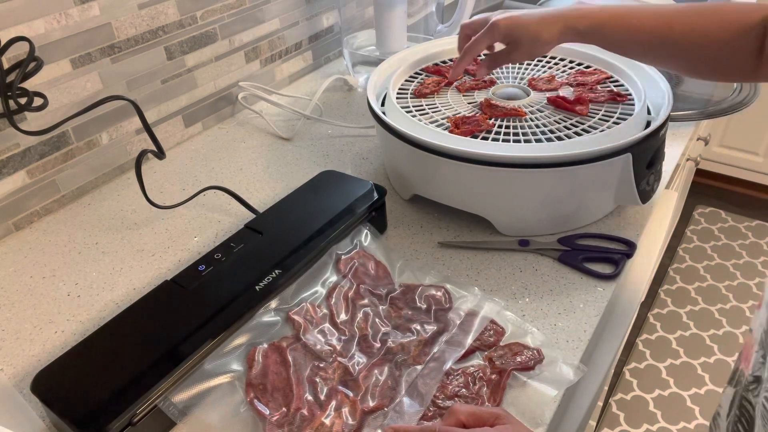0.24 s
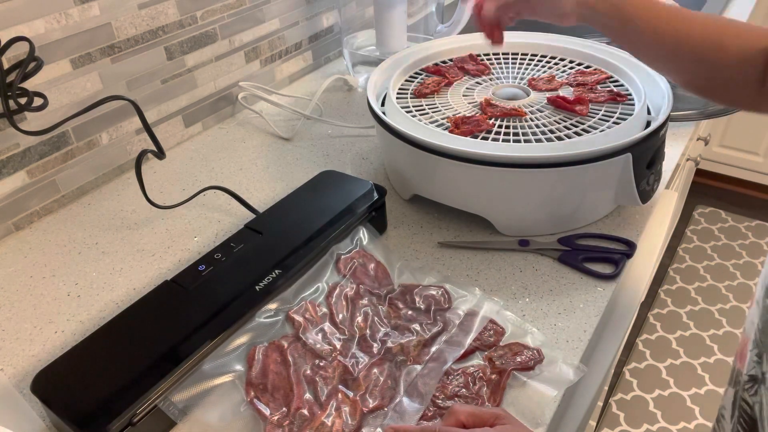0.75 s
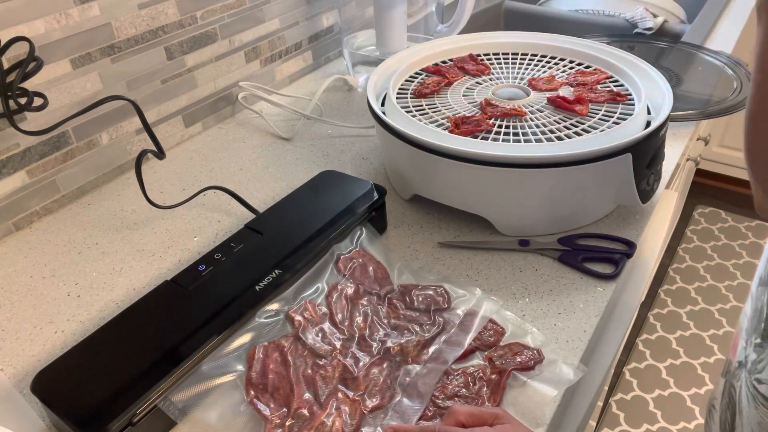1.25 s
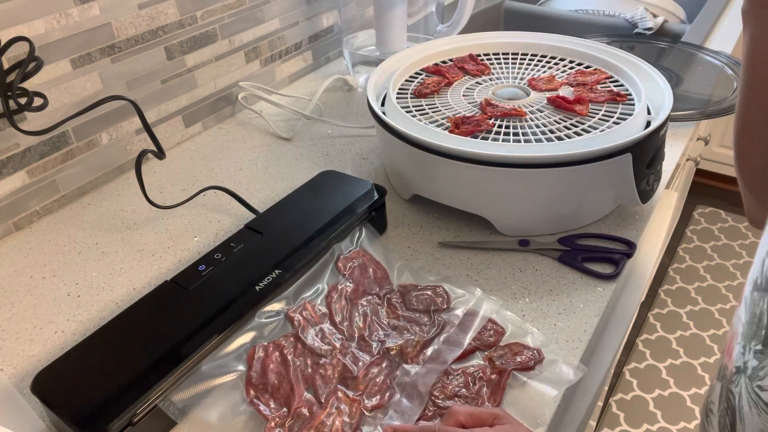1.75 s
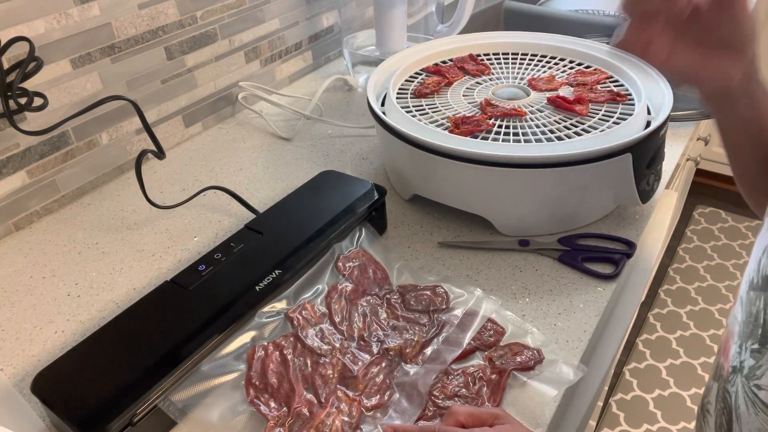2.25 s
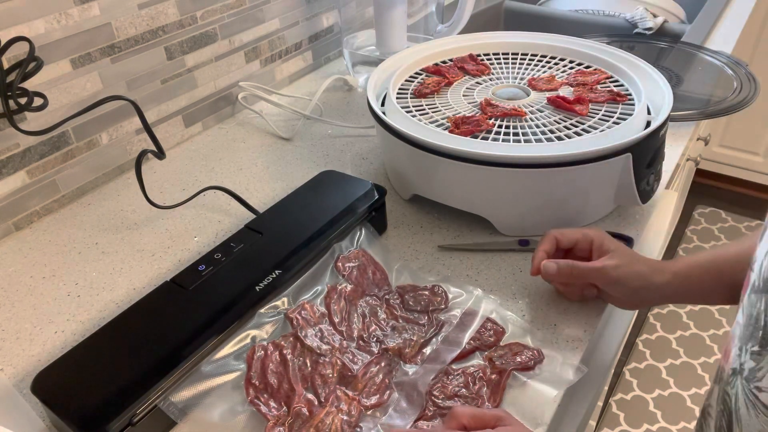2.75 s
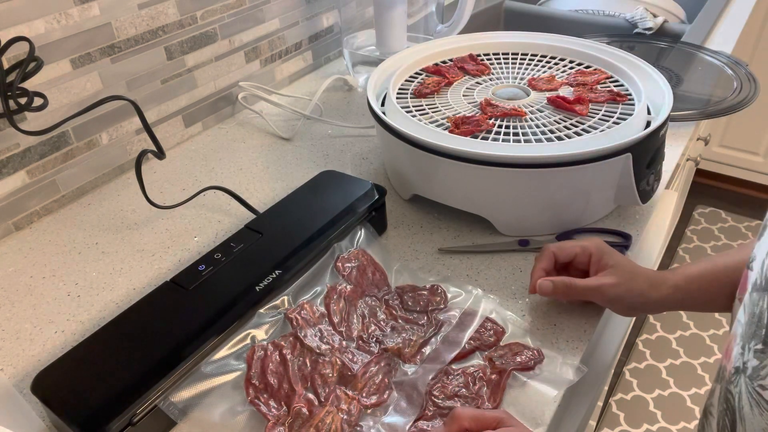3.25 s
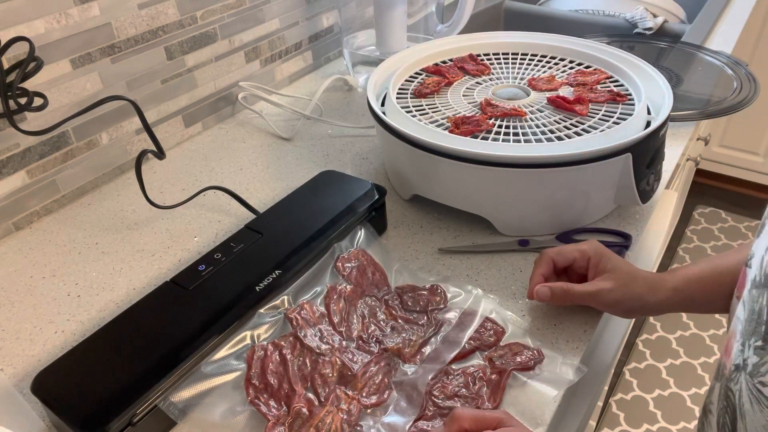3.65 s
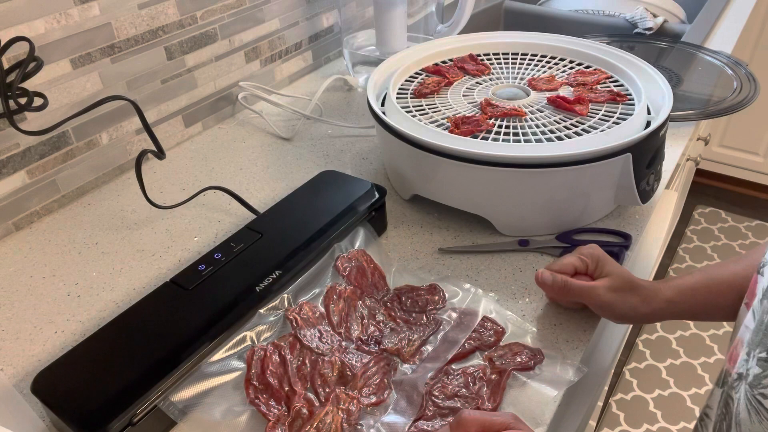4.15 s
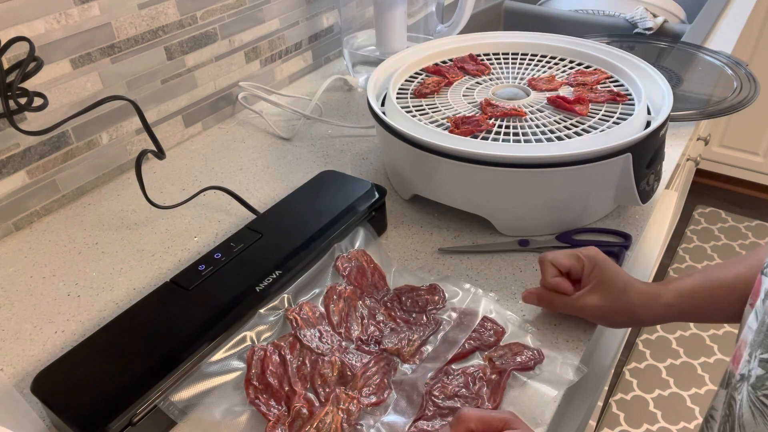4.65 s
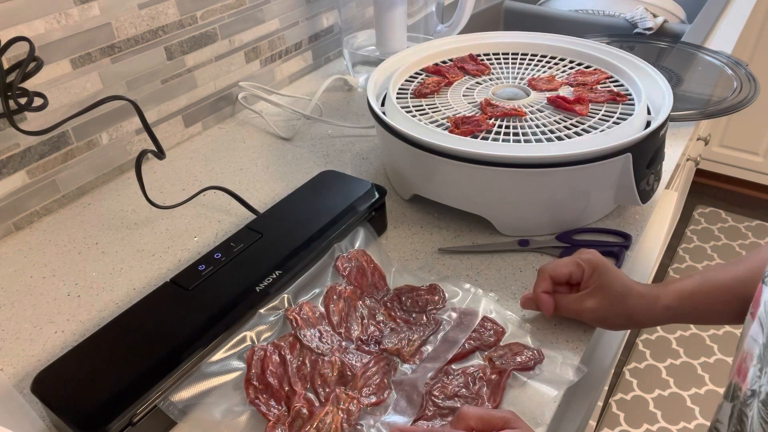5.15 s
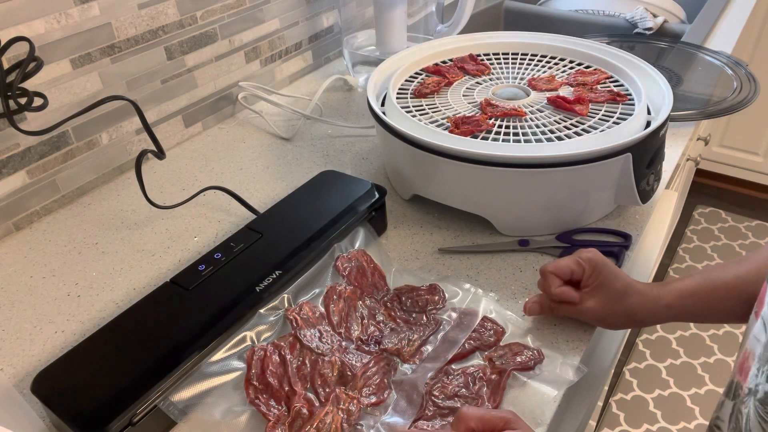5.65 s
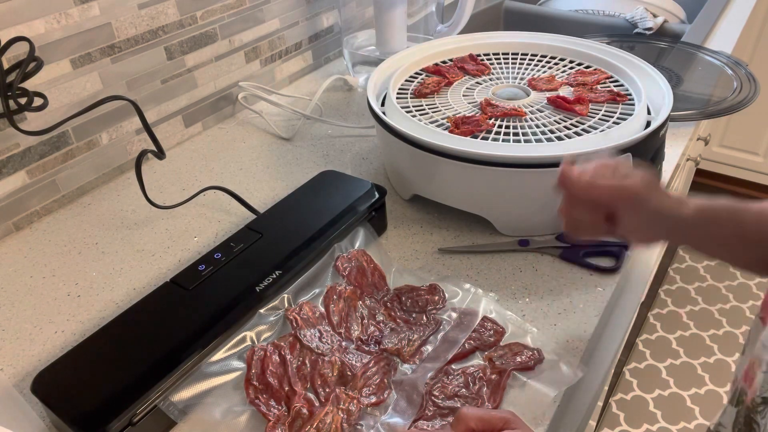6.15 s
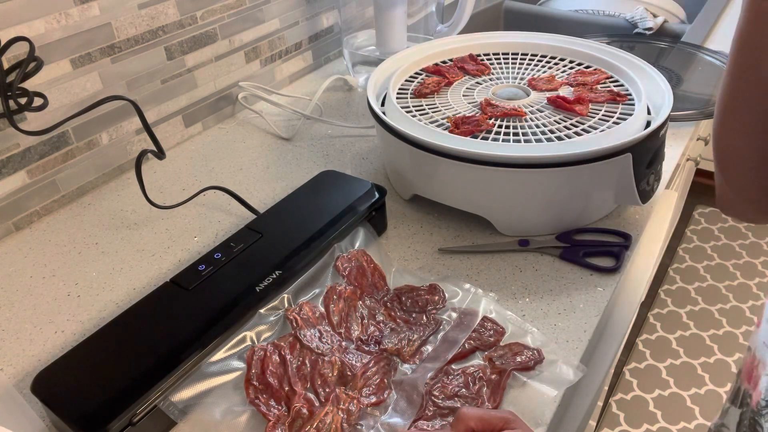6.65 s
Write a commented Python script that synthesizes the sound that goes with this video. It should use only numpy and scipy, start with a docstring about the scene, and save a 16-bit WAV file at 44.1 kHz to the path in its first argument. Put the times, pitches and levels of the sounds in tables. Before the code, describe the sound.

A vacuum sealer is already running, its nasal, rattling drone filling a small kitchen with little echo. It slowly labours downward as the bag tightens, gaining ticks, puffing hiss and uneven gulps, then a hard buzzing knock. After a split-second drop, the unloaded motor jumps up slightly in pitch and hums evenly. Near the end a hand briefly crinkles the plastic. Heard close, in stereo.

```python
"""A kitchen counter, heard in stereo: a vacuum sealer pulls the air out of a bag of meat.
Its diaphragm pump is a drone of shaft multiples that slows and labours as the vacuum builds; filtered
clicks make the valves tick and pulsed noise puffs out air on every turn; at last the diaphragm knocks.
After a short dip it runs on faster and smoother while the bag is sealed. The plastic snaps twice early on
in scattered clicks, rustles as grainy noise, and squeaks as tiny chirps."""
import sys
import numpy as np
from scipy import signal
from scipy.fft import rfft, irfft
from scipy.io import wavfile
from scipy.ndimage import map_coordinates

SR = 44100
rng = np.random.default_rng(int(sys.argv[2]) if len(sys.argv) > 2 else 0)


def output_pcm(signal):
    """Save a mono or channel-first signal as 16-bit PCM at the path in sys.argv[1].

    Samples are clipped to [-1, 1] before scaling.
    """
    pcm = np.clip(np.atleast_2d(signal).T, -1, 1) * 32767
    wavfile.write(sys.argv[1], SR, np.round(pcm).astype(np.int16))


N = 304290
TIME = np.arange(N) / SR
BINS = np.fft.rfftfreq(N, 1 / SR)
SWITCH_S = 3.728   # pumping gives way to sealing


def from_db(db):
    """Turn decibels into an amplitude factor."""
    return 10 ** (np.asarray(db) / 20)


def rms_one(x):
    """Scale a sound to an RMS of 1, both channels together."""
    return x / np.sqrt(np.mean(np.abs(x) ** 2) + 1e-20)


def in_time(rows):
    """Read each column of a curve sample by sample."""
    seconds, *columns = np.transpose(rows)
    return [np.interp(TIME, seconds, column) for column in columns]


def at_hz(points, hz, axis=1):
    """Read one column of a spectrum on a log-frequency axis."""
    points = np.array(points)
    return np.interp(np.log(hz + 1e-9), np.log(points[:, 0]), points[:, axis])


def colour(x, spectrum):
    """Shape a sound by a smooth spectrum."""
    return irfft(rfft(x) * from_db(at_hz(spectrum, BINS)), N)


def drift(rate):
    """Slow chance: unit random knots, rate of them per second, joined by straight lines."""
    knots = rng.standard_normal(2048)
    return np.interp(TIME * rate, np.arange(len(knots)), knots)


# Diffuse sound at the microphone. Each row: frequency in Hz, side against mid in dB.
WIDTH = [(60, -19.5), (200, -3.5), (700, 9), (1300, -3.5), (2400, 8), (3900, -2.5), (6000, 4), (9000, -1),
         (14000, 3)]
DIRECT_SHARE = 0.6   # of the side power, the part that comes straight and reaches the left port first


def widen(pair):
    """Left and right share a direct sound, shifted in phase, and differ by a diffuse one."""
    direct = 1j * np.sqrt(DIRECT_SHARE) * rfft(pair[0])
    diffuse = np.sqrt(1 - DIRECT_SHARE) * rfft(pair[1])
    side = irfft((direct + diffuse) * from_db(at_hz(WIDTH, BINS)), N)
    return np.array([pair[0] + side, pair[0] - side])


def noise():
    """White noise spread over the two microphone ports."""
    return widen(rng.standard_normal((2, N)))


# Resonances of the plastic case. Each row: frequency in Hz, width in Hz, gain in dB at depth 1.
HOUSING = [(1248, 70, -4), (1490, 86, 0.5), (1640, 140, 10.5), (1895, 170, 10), (2120, 350, 8.5),
           (2490, 73, 10), (2684, 150, 14), (3040, 140, 5.5), (3510, 120, 12.5), (4122, 150, 10.5),
           (4466, 95, 12), (4870, 68, 8.5), (5224, 63, 17.5), (5560, 110, 4), (6030, 72, 6.5)]


def housing(x, depth):
    """The plastic case colours narrow bands, mostly lifting them; depth sets how strongly."""
    out = x
    for hz, width_hz, gain_db in HOUSING:
        b, a = signal.iirpeak(hz, hz / width_hz, fs=SR)
        out = out + (from_db(depth * gain_db) - 1) * signal.lfilter(b, a, x)
    return out


def scatter(x, case_t60, room_db, room_t60):
    """A contact rattles briefly through the case, then dies away in the kitchen (t60 in s)."""
    age = TIME[:SR // 2]
    decay = from_db(-60 * age / case_t60) + from_db(room_db - 60 * age / room_t60)
    response = rng.standard_normal((2, len(age))) * decay
    response /= np.sqrt(np.sum(response ** 2) / 2)
    return widen(signal.fftconvolve(x[None], response, axes=1)[:, :N])


def strokes(turns, share):
    """A unit click each time the shaft passes this share of a turn."""
    at = np.interp(np.arange(int(turns[-1])) + share, turns, np.arange(N)).clip(0, N - 2)
    clicks = np.zeros(N)
    # split each click over two samples to place it between them
    clicks[at.astype(int)] = 1 - at % 1
    clicks[at.astype(int) + 1] = at % 1
    return clicks


# Standing waves over the counter. Each row: frequency in Hz, left against right in dB,
# phase in radians by which the left microphone port leads.
PORTS = [(55, 0.5, -0.01), (205, 1.4, 0.48), (310, 2.9, -0.37), (400, -3.5, -0.95), (490, -2.9, 0.83),
         (555, -1.1, 0.63), (610, -2.3, 0.65), (655, 5.6, 0.72), (712, 7.2, 0.31), (765, 5.8, 0.37),
         (818, -0.3, 0.44), (870, 3.1, 0.07), (990, 5.8, 0.43), (1200, 0, 0)]


def partial(turns, order, shaft_hz, delay):
    """One multiple of the shaft rate as both microphone ports get it."""
    hz = order * shaft_hz
    tilt, lead = from_db(at_hz(PORTS, hz) / 2), at_hz(PORTS, hz, axis=2)
    angle = 2 * np.pi * order * turns - delay
    left = tilt * np.cos(angle + lead / 2)
    right = np.cos(angle - lead / 2) / tilt
    return np.array([left, right]) * np.sqrt(2 / (tilt ** 2 + tilt ** -2))


MULTIPLES = np.arange(1, 49)   # of the shaft rate


def ring_lag(partials):
    """Radians by which each multiple trails the blow in a chamber that starts at once and rings on."""
    level = np.log(from_db(np.interp(np.arange(64), *np.transpose(partials))))
    mirrored = np.r_[level, level[-2:0:-1]]
    return signal.hilbert(mirrored).imag[MULTIPLES]


# The drone, from free flow to no air left. Each row: multiple of the shaft rate, relative level in dB.
FREE_FLOW = [(3, -17), (8, -24), (9, -5.5), (10, -1), (11, 1), (12, 0), (13, -3), (14, -6), (15, 0),
             (16, -3.5), (17, -36), (18, -16), (20, -38), (21, -22), (22, -18), (24, -18), (25, -19),
             (29, -24), (30, -26), (32, -19), (33, -20), (34, -17), (40, -18.5), (44, -21.5)]     # air still flows freely
FIRST_PULL = [(3, -15), (6, -11), (7, -37), (8, -8.5), (9, -6.5), (10, -4), (11, -6.5), (12, -1), (13, -23),
              (14, -11.5), (15, -5.5), (16, 3.5), (17, -31), (18, -3.5), (21, -27), (23, -12.5),
              (27, -16.5), (31, -19), (33, -15.5), (41, -23)]   # the pump begins to strain
DRAWING = [(3, -20), (6, -13.5), (7, -16.5), (8, -6), (9, 2.5), (10, -10.5), (11, -5.5), (12, -1),
           (13, -6.5), (14, 6), (16, -4), (17, -28), (18, -12), (19, -14), (20, -17), (21, -40),
           (25, -19.5), (28, -18.5), (32, -23), (33, -32), (34, -16.5), (36, -31), (37, -22), (41, -18),
           (45, -23.5)]         # the film closes in
LABOURING = [(3, -11.5), (7, -2), (8, -7), (9, 2.5), (10, 1), (11, 4.5), (12, 7.5), (13, -3), (14, 6.5),
             (15, 0.5), (16, -36), (17, -7), (18, -11.5), (19, -7.5), (20, -11.5), (23, -15.5), (25, -17.5),
             (27, -14), (28, -20), (32, -30), (33, -25.5), (34, -19), (35, -18), (37, -15.5), (41, -16),
             (46, -19)]     # hardest work
BAG_TIGHT = [(3, -13.5), (6, -12), (9, -0.5), (10, -4.5), (11, -1.5), (12, 4.5), (13, -5.5), (14, 5),
             (15, -23), (16, -5.5), (17, -5.5), (18, -7.5), (19, -8), (20, -11), (21, -10), (24, -14.5),
             (25, -31), (26, -27), (29, -17.5), (31, -36), (32, -12.5), (33, -19), (35, -33), (37, -15),
             (44, -22)]     # little air is left
NO_AIR = [(3, -12.5), (5, -24), (6, -11), (7, -14), (8, -19.5), (9, 0), (10, -4.5), (11, -1.5), (12, 1),
          (13, 1.5), (14, 6.5), (15, -15), (16, -4.5), (17, -7), (18, -11.5), (19, -6.5), (20, -6.5),
          (22, -16), (24, -9.5), (28, -13), (32, -18), (37, -19), (44, -22)]           # the diaphragm works against a vacuum
# The stroke behind each drone. Each row: load, share of a turn at the blow,
# sweep of the low partials in radians per squared multiple, share of a turn at the rap.
STROKE_SHAPES = [(0, .14, .04, .25), (.4, .46, 0, .23), (1, .65, 0, .25), (2, .26, .13, .26),
                 (3, .5, .13, .49), (4, .45, .05, .49)]
SWEEP_CENTRE, RAP_FROM = 11.5, 20   # multiples: centre of the sweep, lowest in the rap
ECHO_DEPTH, ECHO_SHARE = 0.85, 0.3   # echo in the case: radians, lag as a share of a turn


def at_load(load, values):
    """Blend the drones' values to one load, as a column over the multiples."""
    loads = np.transpose(STROKE_SHAPES)[0]
    return np.array([[np.interp(load, loads, column)] for column in values.T])


def loaded_drone(turns, shaft_hz, load):
    """One blow per turn rings the pump chamber; its ring changes smoothly with the load."""
    gains, delays = np.zeros((2, len(STROKE_SHAPES), len(MULTIPLES)))
    for k, partials in enumerate((FREE_FLOW, FIRST_PULL, DRAWING, LABOURING, BAG_TIGHT, NO_AIR)):
        _, blow, sweep, rap = STROKE_SHAPES[k]
        for order, level_db in partials:
            gains[k, round(order) - 1] = from_db(level_db)
        # the tubing spreads the low partials into a sweep; the high ones arrive together as a rap
        ring = ring_lag(partials) + np.pi + 2 * np.pi * MULTIPLES * blow
        ring = ring + sweep * (MULTIPLES - SWEEP_CENTRE) ** 2
        delays[k] = np.where(MULTIPLES < RAP_FROM, ring, 2 * np.pi * MULTIPLES * rap)
    # an echo in the case fills the gaps between blows
    delays += ECHO_DEPTH * np.sin(2 * np.pi * MULTIPLES * ECHO_SHARE)
    delays = np.unwrap(delays, axis=0)
    # one turn of the drone at each of 41 loads, then read along load and shaft angle
    loads, cycle = np.linspace(0, 4, 41), np.linspace(0, 1, 1025)
    waves = []
    for step in loads:
        parts = partial(cycle, MULTIPLES[:, None], shaft_hz, at_load(step, delays))
        waves.append(rms_one(np.sum(at_load(step, gains) * parts, axis=1)))
    where = [load / loads[1], turns % 1 * (len(cycle) - 1)]
    sides = np.stack(waves, axis=1)
    return np.array([map_coordinates(side, where, order=1, mode="nearest") for side in sides])


WAVER_DB, WAVER_DELAY_S = -7.5, 0.007562   # the reflection
WAVER_SWING_S, WAVERS_PER_S = 0.00046, 2.277   # how far and how often its delay wanders


def waver(x):
    """A reflection whose delay wanders makes single partials fade and swell."""
    earlier = TIME - WAVER_DELAY_S - WAVER_SWING_S * drift(WAVERS_PER_S)
    return x + from_db(WAVER_DB) * np.array([np.interp(earlier, TIME, side) for side in x])


# Trapped air comes loose. Each row: time in seconds, half length in seconds, rise of unevenness in dB.
GULPS = [(1.529, 0.049, 4.5), (2.765, 0.036, 14.5), (3.05, 0.18, 4.5), (3.3, 0.098, 5.5),
         (3.69, 0.068, 3.5)]
PUMP_UNEVEN_DB, SEAL_UNEVEN_DB = -23, -40


def unevenness_db():
    """The strokes are always slightly uneven; each gulp makes them more so for a moment."""
    swell = sum(rise_db * np.exp(-((TIME - s) / length) ** 2) for s, length, rise_db in GULPS)
    return np.where(TIME < SWITCH_S, PUMP_UNEVEN_DB + swell, SEAL_UNEVEN_DB)


# Valve closings. Each row: share of a turn, relative force in dB at free flow, the same with no air left.
VALVES = [(.225, 1, -3), (.46, -10, 3), (.6, -8, -16), (.82, -12, -8)]
PUFF_LAG, PUFF_LENGTH = 0.02, 0.24   # air follows each valve, in turns


def valve_strokes(turns, tight):
    """Each valve clicks shut and lets go a fading puff, with a force that shifts as the bag tightens."""
    clicks, puffs = 0, 0.25
    for share, free_db, tight_db in VALVES:
        force = from_db(free_db + tight * (tight_db - free_db))
        clicks = clicks + force * strokes(turns, share)
        puffs = puffs + force * np.exp(-((turns - share - PUFF_LAG) % 1) / PUFF_LENGTH)
    return clicks, puffs


# Valve ticks. Each row: frequency in Hz, relative level in dB.
TICK_COLOUR = [(700, -23), (1000, 12), (1400, -0.5), (1800, -1), (2350, -7.5), (2800, -12), (3250, -15),
               (3600, -13.5), (4400, -12.5), (5300, -21), (6500, -22), (10000, -27.5), (12000, -75)]


def valve_ticks(clicks):
    """The valve clicks, slightly uneven in force, rattle the case."""
    rattle = scatter(clicks * from_db(1.2 * drift(100)), case_t60=0.014, room_db=-18, room_t60=0.3)
    return rms_one(housing(colour(rattle, TICK_COLOUR), depth=0.7))


# Air leaving the exhaust, and the thin hiss of its jet. Each row: frequency in Hz, relative level in dB.
AIR_COLOUR = [(700, -10), (1000, -7.5), (1500, -3.5), (2300, 3.5), (2900, 0), (3500, -4), (4400, 4),
              (5300, -4.5), (6400, -0.5), (8000, -4.5), (10000, -18), (11000, -31.5), (15500, -5.5)]
JET_COLOUR = [(6300, -35), (6800, -2.5), (8000, -10.5), (8550, 8), (9050, -6.5), (9500, 13.5), (10100, -1),
              (10900, -36), (14000, -13.5), (15500, -25.5)]


def exhaust(puffs):
    """Turbulent noise pulsed by the puffs, as air through the case and as a bare jet hiss."""
    pulsed = noise() * puffs
    air = rms_one(housing(colour(pulsed, AIR_COLOUR), depth=1.1))
    jet = rms_one(colour(pulsed, JET_COLOUR))
    return air, jet


# Intake flap. Each row: frequency in Hz, relative level in dB.
FLAP_COLOUR = [(2500, -5), (3600, -13), (4300, 1.5), (5700, 2.5), (6400, -10), (9000, -7), (11000, -40)]
FLAP_SHARE = 0.8   # of a turn, when the flap shuts


def flap(turns):
    """The intake flap shuts with a thin, bright rattle."""
    rattle = scatter(strokes(turns, FLAP_SHARE), case_t60=0.03, room_db=-19, room_t60=0.27)
    return rms_one(housing(colour(rattle, FLAP_COLOUR), depth=1))


# Work of the pump. Each row: time in seconds, load from 0 free flow, 1 drawing down, 2 labouring,
# 3 bag tight to 4 no air left.
LOAD = [(0, 0), (.55, .03), (.88, .4), (1.1, .55), (1.38, 1), (1.55, 1.1), (2.1, 1.95), (2.4, 2.1),
        (2.8, 3), (3.15, 3.1), (3.42, 4)]
# The pump's layers, one row for each load from 0 to 4: drone, counter hum, valve ticks, exhaust air,
# jet hiss, intake flap and knock, all in dB.
LOAD_LEVELS = [(-32.5, -48, -47.5, -54.5, -68, -57.5, -70), (-31.5, -37, -44.5, -53.5, -66, -62, -73),
               (-26.5, -34, -39, -50.5, -55.5, -60, -61), (-27.5, -35.5, -40, -47.5, -53, -56, -50),
               (-29.5, -36.5, -42, -50, -55, -61.5, -43)]
PUMP_PAN_DB = -0.5   # drone and hum, left minus right


def pumping(turns, shaft_hz):
    """Load reshapes the drone and shifts force between the valves; with no air left the diaphragm knocks."""
    load, = in_time(LOAD)
    layers_db = [np.interp(load, np.arange(len(c)), c) for c in np.transpose(LOAD_LEVELS)]
    drone_db, hum_db, tick_db, air_db, jet_db, flap_db, knock_db = layers_db
    # gulps make the strokes uneven in time and force
    uneven = from_db(unevenness_db())
    uneven_turns = turns + 0.012 * uneven * drift(80)
    force_db = uneven * (3.9 * drift(110) + 5.4 * drift(21.88))
    drone = waver(loaded_drone(uneven_turns, shaft_hz, load)) * from_db(drone_db + force_db)
    hum = from_db(hum_db) * partial(turns, order=4, shaft_hz=shaft_hz, delay=0)
    body = (drone + hum) * from_db(PUMP_PAN_DB * np.array([[1], [-1]]) / 2)
    # the crank is out of balance
    wobble = from_db(-55.5) * partial(turns, order=1, shaft_hz=shaft_hz, delay=0)
    clicks, puffs = valve_strokes(turns, tight=load / load.max())
    ticks = from_db(tick_db) * valve_ticks(clicks)
    air, jet = exhaust(puffs)
    breath = from_db(air_db) * air + from_db(jet_db) * jet
    contacts = from_db(flap_db) * flap(turns) + from_db(knock_db) * knock(turns, uneven)
    return body + wobble + ticks + breath + contacts


# Gulped air. Each row: frequency in Hz, relative level in dB.
SPUTTER_COLOUR = [(70, -8), (160, -2.5), (300, 7), (450, -8.5), (700, 10), (1050, 3.5), (1500, -3),
                  (2300, 0.5), (3200, -46.5)]


def sputter(turns):
    """Irregular gulps of air, noise pulsed once a turn, roughen the strokes."""
    pulses = 0.4 + np.exp(-((turns - 0.25) % 1) / 0.3)
    gulps = pulses * from_db(3 * drift(90))
    return from_db(unevenness_db() - 19.5) * rms_one(colour(noise() * gulps, SPUTTER_COLOUR))


# The kitchen around the counter. Each row: frequency in Hz, relative level in dB.
ROOM_COLOUR = [(20, -25), (38, -23), (52, -2.5), (70, -7), (110, -15), (160, -14), (260, -18), (450, -20),
               (700, -20), (1200, -30), (2200, -30), (3500, -41), (9000, -46), (15000, -110)]


def room():
    """Steady, mostly low noise of the kitchen."""
    return from_db(-46) * rms_one(colour(noise(), ROOM_COLOUR))


# A hand brushes the bag. Each row: time in seconds, peak in dB, time to fade by 60 dB in seconds
# (held between 0.01 and 1, so that a negative one stops at once).
BRUSHES = [(3.9, -75, 1), (5.68, -87, .9), (5.801, -73, .2), (6.13, -73, -1), (6.205, -56.5, 0.6),
           (6.255, -64, -1.5), (6.31, -70, -2), (6.46, -83, -5)]
BRUSH_ATTACK_S, CRINKLE_DB = 0.013, -90   # the film never quite rests


def brushing():
    """Each brush of the hand swells quickly and fades."""
    level = from_db(CRINKLE_DB)
    for s, db, t60 in BRUSHES:
        age = TIME - s
        swell = np.exp(np.minimum(age, 0) / BRUSH_ATTACK_S)
        fade = from_db(db - 60 * np.maximum(age, 0) / np.clip(t60, 1e-2, 1))
        level = level + swell * fade
    return level


# Rustling film. Each row: frequency in Hz, relative level in dB.
RUSTLE_COLOUR = [(2000, -19), (5000, -0.5), (8000, 10.5), (11000, -8.5), (13500, 12), (16000, 4)]


def rustle():
    """The film crinkles under the hand: noise in grains of 64 samples, each with its own level."""
    grain_levels = from_db(4 * rng.standard_normal(N // 64 + 1)).repeat(64)[:N]
    return brushing() * rms_one(colour(noise() * grain_levels, RUSTLE_COLOUR))


# Snaps of the film and, at 3.443 s, one knock of the pump. Each row: time in seconds, relative level in dB.
SINGLE_CLICKS = [(0.1832, -28), (0.3769, -38), (3.443, -36)]
# Their shared spectrum. Each row: frequency in Hz, relative level in dB.
SINGLE_CLICK_COLOUR = [(600, -4.5), (1300, 2.5), (2400, -2.5), (3600, 5.5), (4500, -11), (9000, -31),
                       (15000, -59)]


def snaps_and_single_knock():
    """Two snaps of the film and one knock of the pump: clicks that rattle and die away in the kitchen."""
    clicks = np.zeros(N)
    for s, db in SINGLE_CLICKS:
        clicks[round(s * SR)] = from_db(db + 20.5)
    rattle = scatter(clicks, case_t60=0.013, room_db=-26.0, room_t60=0.35)
    return colour(rattle, SINGLE_CLICK_COLOUR)


# Diaphragm knock. Each row: frequency in Hz, relative level in dB.
KNOCK_COLOUR = [(500, -13), (850, 7.5), (1100, -10.5), (1500, 11), (2300, -23), (3200, -38), (8000, -48.5)]


def knock(turns, uneven):
    """The diaphragm slaps at the end of its travel, with a force that drifts from turn to turn."""
    uneven_turns = turns + 0.02 * uneven * drift(80)
    clicks = strokes(uneven_turns, 0.465) * from_db(1.8 * drift(60))
    rattle = scatter(clicks, case_t60=0.0047, room_db=-17.5, room_t60=0.29)
    return rms_one(colour(rattle, KNOCK_COLOUR))


BREAK_S = 3.724   # the deepest point
BREAK_DEPTH_DB, BREAK_FALL_S, BREAK_RISE_S = 21.5, 0.0286, 0.025


def changeover():
    """The level of the whole sound falls and recovers between pumping and sealing."""
    away = np.maximum((BREAK_S - TIME) / BREAK_FALL_S, (TIME - BREAK_S) / BREAK_RISE_S)
    return from_db(-BREAK_DEPTH_DB * np.clip(1 - away, 0, 1))


# The unloaded pump; early and late strokes alternate and give half multiples.
# Each row: multiple of the shaft rate, relative level in dB.
SEAL_DRONE = [(1.0, -16.5), (3.0, -24.5), (4.0, -20), (6.0, -22.5), (6.5, -23), (7.0, -20), (7.5, -25),
              (8.0, -21), (9.0, -19), (10.0, -17), (10.5, -29), (11.0, -13.5), (11.5, -13.5), (12.0, 1.5),
              (12.5, -13.5), (13.0, -1), (13.5, -14), (14.0, -24), (15.0, -16.5), (16.0, -24.5),
              (17.0, -27), (18.0, -25), (19.0, -25.5), (21.0, -28), (22.0, -26), (23.0, -38.5),
              (25.0, -32.5), (32.0, -35.5), (33.0, -22.5), (33.5, -40.5), (34.0, -35.5), (38.0, -22.5),
              (40.0, -23), (40.5, -26), (41.0, -46.5), (44.5, -39.5), (45.0, -36), (49.0, -39),
              (54.0, -43.5), (66.0, -43.5)]


def unloaded_drone(turns, shaft_hz, ring_hz, ring_width_hz, dispersion, smear):
    """Every stroke rings the pump chamber; reflections smear its partials. It repeats after two turns."""
    cycle = np.linspace(0, 2, 4097)
    wave, knee = 0, 6.5   # knee: multiples above the ring where the dispersion stops growing
    for order, level_db in SEAL_DRONE:
        halves = round(2 * order)
        delay = np.arctan2(halves / 2 * shaft_hz - ring_hz, ring_width_hz)
        delay += smear * rng.standard_normal()
        delay += dispersion * min(halves / 2 - ring_hz / shaft_hz, knee) ** 2
        delay += np.pi / 2 * (halves % 2)   # half multiples make alternate strokes early and late
        wave = wave + from_db(level_db) * partial(cycle, halves / 2, shaft_hz, delay)
    return np.array([np.interp(turns % 2, cycle, side) for side in rms_one(wave)])


# Taps of the unloaded pump. Each row: share of two turns, relative level in dB.
SEAL_TAPS = [(0.245, -18), (.29, 1), (.41, 5.5), (0.746, -2.5), (.79, 7.5), (0.856, -11), (0.921, 6)]
# Its ticks and air. Each row: frequency in Hz, relative level in dB.
SEAL_COLOUR = [(250, -14), (400, 8.5), (900, 6), (1200, 5.5), (1500, -4), (1800, 0.5), (2150, -1),
               (2400, -14), (2900, -15.5), (3600, -22), (4300, -18.5), (4800, -27.5), (5300, -15.5),
               (6400, -26.5), (9500, -32.5), (11500, -49.5), (15500, -35)]
SEAL_DRONE_DB, SEAL_CLIMB_DB_PER_S = -29.5, 0.16   # the unloaded pump slowly gains strength


def sealing(turns, shaft_hz):
    """Unloaded, the pump purrs on two strong partials, and its ticks repeat every second turn."""
    drone_db = SEAL_DRONE_DB + SEAL_CLIMB_DB_PER_S * (TIME - SWITCH_S)
    drone = from_db(drone_db) * unloaded_drone(turns - 0.7, shaft_hz, ring_hz=704.8, ring_width_hz=215,
                                               dispersion=0.304, smear=0.61)
    clicks = sum(from_db(db) * strokes(turns / 2, share) for share, db in SEAL_TAPS)
    rattle = scatter(clicks * from_db(0.3 * drift(100)), case_t60=0.016, room_db=-25, room_t60=0.29)
    ticks = from_db(-43.0) * rms_one(housing(colour(rattle, SEAL_COLOUR), depth=1.0))
    puffs = 0.3 + np.exp(-((turns - 0.52) % 1) / 0.28)
    air = from_db(-59.5) * rms_one(housing(colour(noise() * puffs, SEAL_COLOUR), depth=1))
    return drone * from_db([[0.3], [-0.6]]) + ticks + air   # the drone leans left


# Tiny squeaks of the tightening film. Each row: time in seconds, level in dB, frequency in Hz.
SQUEAKS = [(4.119, -49, 4610), (5.627, -50, 4500)]


def squeaks():
    """The film squeaks in short rising chirps."""
    chirps = 0
    for s, db, hz in SQUEAKS:
        age = TIME - s
        swell = from_db(db) * np.exp(-(age / 0.0025) ** 2)
        chirps = chirps + swell * np.sin(2 * np.pi * hz * age * (1 + 2.5 * age))
    return chirps


# Pump shaft. Each row: time in seconds, speed in turns per second.
SPEED = [(0, 54.925), (0.35, 54.583), (0.7, 54.107), (1, 53.587), (1.35, 52.863), (1.7, 52.093),
         (2.1, 51.38), (2.4, 51.031), (2.75, 50.85), (3.1, 50.797), (3.4, 50.903), (3.71, 51.218),
         (3.74, 54.565), (4.6, 54.593), (6.9, 54.614)]


def scene():
    """The shaft drives the pump, first pumping and then sealing; the bag and the kitchen lie around it."""
    speed, = in_time(SPEED)
    turns = np.cumsum(speed) / SR
    first = TIME < SWITCH_S
    pump = np.where(first, pumping(turns, speed[first].mean()), sealing(turns, speed[~first].mean()))
    film = squeaks() + rustle()
    return (pump + sputter(turns) + snaps_and_single_knock() + film + room()) * changeover()


CUTOFF_HZ = 15850


def record(dry):
    """At the microphone the top is cut steeply by an elliptic low-pass."""
    return signal.sosfilt(signal.ellip(10, 0.1, 80, CUTOFF_HZ, fs=SR, output="sos"), dry)


dry = scene()
out = record(dry)
output_pcm(out)
```